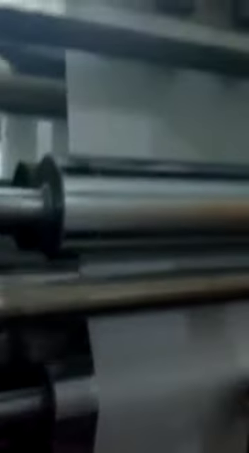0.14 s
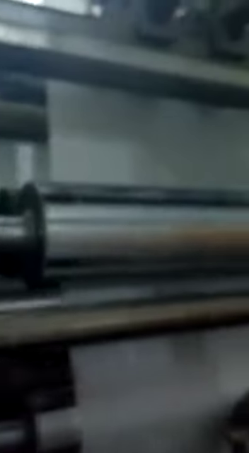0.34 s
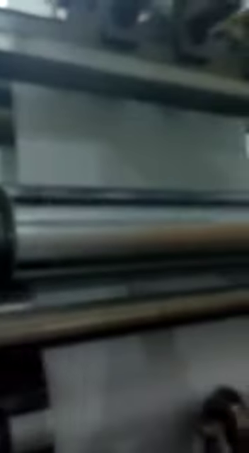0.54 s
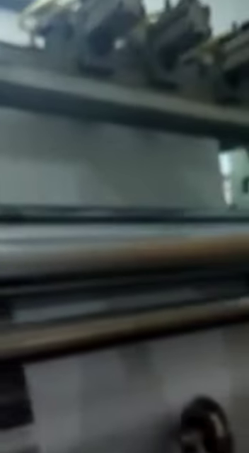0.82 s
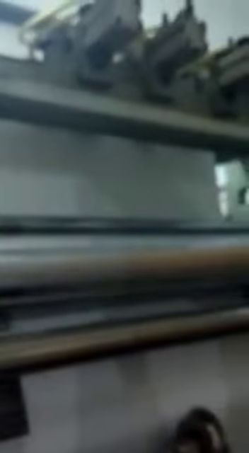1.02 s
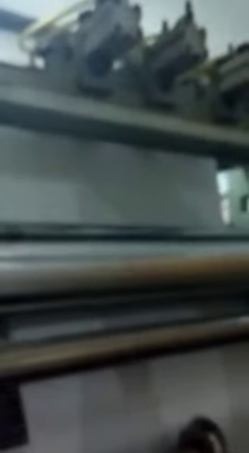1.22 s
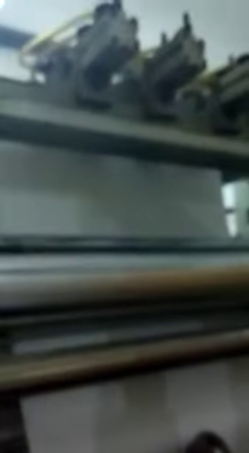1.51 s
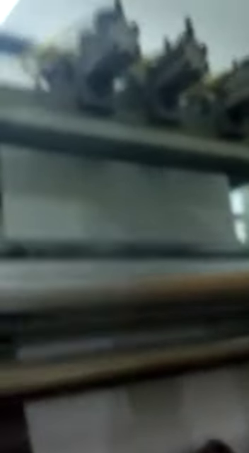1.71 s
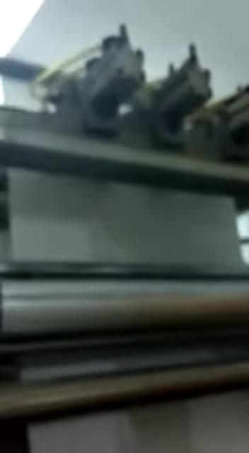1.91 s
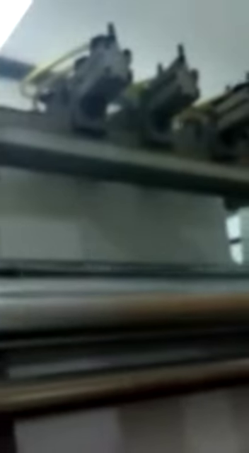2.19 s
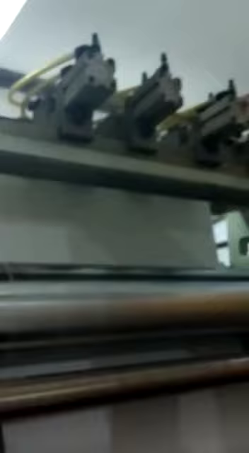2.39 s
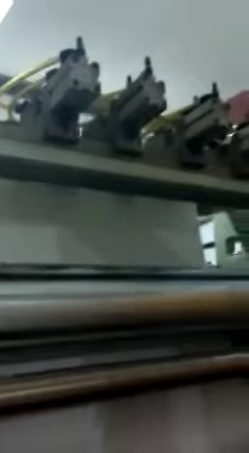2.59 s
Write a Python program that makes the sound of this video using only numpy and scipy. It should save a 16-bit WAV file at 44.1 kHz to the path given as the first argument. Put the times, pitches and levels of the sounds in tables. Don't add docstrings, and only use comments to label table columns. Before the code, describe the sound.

A paper converting machine runs close by in a workshop: steady roller roar and bright paper hiss, crisp snaps about four or five a second, a regular knock, loose thumps and a thin gear whine.

```python
import sys
import numpy as np
from scipy import signal
from scipy.fft import rfft, irfft, next_fast_len
from scipy.io import wavfile
from scipy.ndimage import uniform_filter1d, map_coordinates

SR = 44100
rng = np.random.default_rng(int(sys.argv[2]) if len(sys.argv) > 2 else 0)


def to_wav(sig):
    pcm = np.clip(np.atleast_2d(sig), -1, 1) * 32767
    pcm = np.round(pcm).astype(np.int16)
    wavfile.write(sys.argv[1], SR, pcm.T)


def gain_from_decibels(decibels):
    exponent = np.asarray(decibels, float) / 20
    return 10 ** exponent


N = 121275
TIME = np.arange(N) / SR
HALF = np.array([[.5], [-.5]])


def unit(x):
    return x / np.sqrt(np.mean(x ** 2) + 1e-20)


def along(points, hz):
    f, v = np.transpose(points)
    return np.interp(np.log(hz + 1), np.log(f + 1), v)


def curves(rows):
    s, *columns = np.transpose(rows)
    return [np.interp(TIME, s, column) for column in columns]


def wobble(rate):
    knots = rng.standard_normal(int(N * 100 / SR) + 4)
    return map_coordinates(knots, [np.arange(N) * min(rate, 99) / SR])


def filtered(x, response):
    m = next_fast_len(N + SR // 4)
    return irfft(rfft(x, m) * response(np.fft.rfftfreq(m, 1 / SR)), m)[..., :N]


def closed(spectrum, hz):
    low = (spectrum[0][0] / 2, -90)
    high = (spectrum[-1][0] * 2, -90)
    return gain_from_decibels(along([low] + list(spectrum) + [high], hz))


def likeness(hz):
    # (frequency [Hz], likeness [-1 to 1])
    bass_alike = [(50, .9), (100, .8), (300, .75), (640, .82), (1050, .97)]
    # (frequency [Hz], likeness [0 to 1])
    comb_depth = [(1000, .99), (2400, 1), (3500, 1), (4700, 0.99), (6000, .8), (7100, 0.88), (8300, 0.73),
                  (9500, 0.12)]
    first_hz, period_hz, flatness = 1110, 2410, 0.8
    wave = np.cos(2 * np.pi * (hz - first_hz) / period_hz)
    comb = np.tanh(flatness * wave) / np.tanh(flatness)
    return np.clip(np.where(hz < first_hz, along(bass_alike, hz), comb * along(comb_depth, hz)), -1, 1)


def rush(gain, alike, patchy_db):
    hz, _, z = signal.stft(rng.standard_normal((2, N)), SR, nperseg=512)
    field = uniform_filter1d(rng.standard_normal(z.shape[1:]), size=6, axis=0)
    field = uniform_filter1d(field, size=8, axis=1)
    frames = np.minimum(np.arange(z.shape[2]) * 256, N - 1)
    drift = .025 * wobble(14)[frames]
    loose = .07 * np.clip(wobble(14)[frames] - .5, 0, 2)
    angle = np.arccos(alike(hz[:, None] * (1 + drift)) * (1 - loose)) / 2
    shares = np.array([np.cos(angle), np.sin(angle)])
    pair = signal.istft(z * gain_from_decibels(patchy_db * unit(field)) * shares, nperseg=512)[1][:, :N]
    mid, side = filtered(pair, gain)
    return unit(np.array([mid + side, mid - side]))


def late(x):
    lag_s, turn_rad = .000433, 1.96
    return filtered(x, lambda hz: np.exp(np.array([[-1j], [1j]]) * (np.pi * hz * lag_s + turn_rad / 2)))


def bursts(events, rise_s, t60):
    total = 0
    for s, db in events:
        swell_db = 40 * (TIME - s) / rise_s
        decay_db = -60 * (TIME - s) / t60
        total = total + gain_from_decibels(db + np.where(TIME < s, swell_db, decay_db))
    return total


def rollers():
    # (time [s], roar level [dB])
    load = [(0.0, -22), (0.2, -19), (0.61, -20), (0.67, -20), (0.73, -20.5), (0.93, -20), (0.95, -22),
            (1.08, -20.5), (1.32, -19), (1.42, -24.5), (1.43, -22), (1.98, -20), (2.55, -21.5), (2.64, -19),
            (2.71, -22.5), (2.75, -20.5)]
    # (time [s], hiss level [dB])
    web = [(0.0, -31), (0.39, -30), (0.84, -31), (1.19, -31.5), (1.41, -34), (1.58, -34), (1.87, -29.5),
           (2.15, -33.5), (2.4, -32), (2.5, -30.5), (2.75, -30.5)]
    # (frequency [Hz], level [dB per Hz])
    roar_spectrum = [(40, -31), (60, -17), (78, -16.5), (150, -2), (310, -3.5), (520, -2.5), (1400, -6.5),
                     (2500, -15.5)]
    rub_spectrum = [(1500, -26), (2500, 5), (3300, -0.5), (4500, -4.5), (6000, -6), (7200, -11.5),
                    (8500, -11), (11000, -16)]
    hiss_spectrum = [(6000, -29), (8000, -10.5), (9700, -5.5), (10600, 0.5), (11300, 2.5), (12300, 1),
                     (14250, 0)]
    # (frequency [Hz], width [Hz], level over the roar [dB])
    frame = [(92, 7, 9), (149, 9, 4), (195, 35, 4), (352, 35, 5), (400, 30, 3), (465, 40, 4), (542, 40, 3),
             (635, 80, 4), (790, 220, -3.5), (955, 60, 2), (1100, 30, 2), (1775, 40, 3), (1900, 200, 4),
             (2190, 120, 2)]

    def modes(hz):
        power = 1
        for center, width, db in frame:
            power = power + (gain_from_decibels(2 * db) - 1) / (1 + (2 * (hz - center) / width) ** 2)
        return np.sqrt(power)

    (load_db,), (web_db,) = curves(load), curves(web)
    web_db = web_db - web_db.mean()
    dip = let_go()
    roar = rush(lambda hz: closed(roar_spectrum, hz) * modes(hz), likeness, patchy_db=1.21)
    rub = rush(lambda hz: closed(rub_spectrum, hz), likeness, patchy_db=0.88)
    hiss = late(rush(lambda hz: closed(hiss_spectrum, hz), lambda hz: .5 + 0 * hz, patchy_db=2.5))
    flutter = .7 * wobble(15.03) + 0.48 * wobble(60)
    roar_db = load_db + 1.43 + 0.55 * dip + 0.34 * wobble(9.7)
    rub_db = load_db - 7 + 0.16 * web_db + 0.64 * dip + 1.22 * flutter
    hiss_db = load_db.mean() - 7.5 + web_db + dip + flutter
    return gain_from_decibels(roar_db) * roar + gain_from_decibels(rub_db) * rub + gain_from_decibels(hiss_db) * hiss


def let_go():
    dip_db = [3.5, 2, 2]
    turn_s, first_s = .6575, .05
    fall_s, recover_s = 0.0057, 0.16
    strokes = (TIME - first_s) % turn_s / turn_s * len(dip_db)
    since = strokes % 1 * turn_s / len(dip_db)
    recovery = 1 - (since - 2 * fall_s) / recover_s
    shape = np.clip(np.minimum(since / fall_s, recovery), 0, 1)
    dip = -np.array(dip_db)[strokes.astype(int)] * shape
    return dip - dip.mean()


def drum():
    # (time [s], peak level [dB])
    snaps = [(0.1785, -20.5), (0.4, -29), (0.6194, -34), (0.837, -19), (1.058, -20.5), (1.2755, -21),
             (1.4935, -20.5), (1.7125, -19.5), (1.931, -27), (2.1518, -17), (2.371, -19.5), (2.592, -20.5)]
    # (time [s], peak level [dB])
    knocks = [
        (.045, -18),
        (.703, -17),
        (1.36, -17),
        (2.015, -16),
        (2.675, -16),
    ]
    # (time [s], peak level [dB])
    thumps = [(0.383, -11), (0.617, -16), (0.659, -8), (0.771, -9), (0.855, -8), (0.923, -7), (1.045, -6.5),
              (1.17, -12), (1.231, -6.5), (1.429, -12), (1.746, -5.5), (1.883, -31), (1.984, -1.5),
              (2.138, -18), (2.573, -7), (2.722, -13)]
    # (frequency [Hz], level [dB per Hz])
    snap_spectrum = [(2500, -16), (5000, 1), (8000, 2.5), (11500, -0.5), (14200, -9)]
    knock_spectrum = [(1500, -25), (2400, -4), (2800, 0), (3400, -6), (6000, -10), (10000, -22)]
    thump_spectrum = [(150, -15), (350, -12), (620, 0), (800, -13), (1400, -8)]
    ticks = [(s - .023, db - 5) for s, db in snaps]
    snap = rush(lambda hz: closed(snap_spectrum, hz), likeness, patchy_db=2.5)
    knock = rush(lambda hz: closed(knock_spectrum, hz), likeness, patchy_db=-1.0)
    thump = rush(lambda hz: closed(thump_spectrum, hz), likeness, patchy_db=1.5)
    return (gain_from_decibels(-3.5) * bursts(list(snaps) + ticks, rise_s=0.001, t60=.09) * snap
            + gain_from_decibels(-3.5) * bursts(knocks, rise_s=.016, t60=.06) * knock
            + gain_from_decibels(-13) * bursts(thumps, rise_s=0.0029, t60=0.14) * thump)


def gears():
    # (time [s], level [dB], left-right difference [dB])
    mesh = [(0, -27.5, -2), (.5, -25.5, -2), (.75, -31.5, -2), (1.05, -31.5, -3), (1.3, -28, -3),
            (1.7, -28.5, -3), (1.95, -24.5, -3), (2.4, -22, -3), (2.75, -22, -3)]
    # (frequency [Hz], rms level [dB])
    beside = [(2222.5, -37), (2260.4, -41), (2162, -42), (2135, -43)]
    mesh_hz, skew_rad = 2211.1, .45
    level_db, pan_db = curves(mesh)

    def tone(hz, db):
        phase = 2 * np.pi * (hz * TIME + rng.random()) + .35 * wobble(10) + HALF * skew_rad
        return np.sqrt(2) * gain_from_decibels(db) * np.sin(phase)

    whine = tone(mesh_hz, level_db + 1.1 * wobble(25))
    whine = whine + sum(tone(hz, db + 2 * wobble(8)) for hz, db in beside)
    return whine * gain_from_decibels(HALF * pan_db) * 2 * HALF


def bearing():
    # (time [s], peak level [dB], frequency [Hz])
    chirps = [(0.0184, -15, 11200), (0.62, -23, 10980), (0.6549, -13, 11300), (0.838, -15, 11460),
              (0.8495, -9.5, 11350), (1.0176, -16.5, 10600), (1.06, -17, 10900), (1.2353, -15.5, 10600),
              (1.288, -14, 10900), (1.677, -13.5, 10560), (2.3297, -12.5, 10440), (2.3711, -13, 11000),
              (2.385, -13.5, 11500), (2.6056, -13, 11350)]
    width_hz = 360
    noise = rng.standard_normal(N)
    squeaks = 0
    for s, db, center in chirps:
        narrow = unit(filtered(noise, lambda hz: 1 / (1 + ((hz - center) / width_hz) ** 2)))
        squeaks = squeaks + bursts([(s + 0.0018, db - 7.5)], rise_s=0.0022, t60=0.05) * narrow
    return late(np.array([squeaks, squeaks]))


def motors():
    # (frequency [Hz], rms level [dB])
    shafts = [
        (49.3, -49),
        (89.6, -41.5),
    ]
    # (time [s], frequency [Hz], level [dB])
    roll = [(0.0, 536.3, -30), (0.25, 540, -28), (0.34, 537.0, -48), (0.38, 545.6, -20.5),
            (0.68, 531.5, -29.5), (0.71, 541.6, -52), (0.87, 535.2, -27), (0.98, 541.9, -37),
            (1.19, 540.8, -24), (1.33, 553.5, -27), (1.42, 540, -35), (1.92, 544.6, -25.5),
            (2.05, 533.3, -35), (2.37, 545, -31.5), (2.48, 532.3, -40), (2.75, 548.9, -28.5)]
    hum = 0
    for hz, db in shafts:
        level = np.sqrt(2) * gain_from_decibels(db + 1.5 * wobble(6))
        hum = hum + level * np.sin(2 * np.pi * hz * TIME + .4 * wobble(4))
    roll_hz, roll_db = curves(roll)
    phase = 2 * np.pi * np.cumsum(roll_hz) / SR + 1.1 * wobble(22)
    hum = hum + np.sqrt(2) * gain_from_decibels(roll_db - 5 + 3.5 * wobble(20)) * np.sin(phase)
    return np.array([hum, hum])


def scene():
    # (frequency [Hz], left-right difference [dB])
    pan = [(70, 11), (110, 3.5), (200, 0.4), (2450, -2), (2800, -3.5), (4500, -1), (8000, -4.5),
           (14000, -6.5)]
    # (frequency [Hz], phase [rad])
    bass_lead = [(60, 2.6), (130, 1.24), (340, 0.84), (700, 0.38), (1000, .01)]
    ports = lambda hz: gain_from_decibels(HALF * along(pan, hz)) * np.exp(-1j * HALF * along(bass_lead, hz))
    return filtered(rollers() + drum() + bearing() + motors(), ports) + gears()


def roll_off(x):
    return signal.sosfilt(signal.butter(12, 15430, fs=SR, output="sos"), x)


def record(dry):
    mix = filtered(dry, lambda hz: hz < 14270)
    return roll_off(mix)


dry = scene()
out = record(dry)
to_wav(out)
```